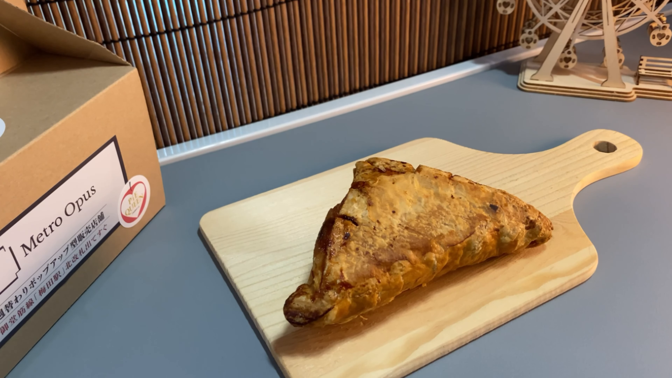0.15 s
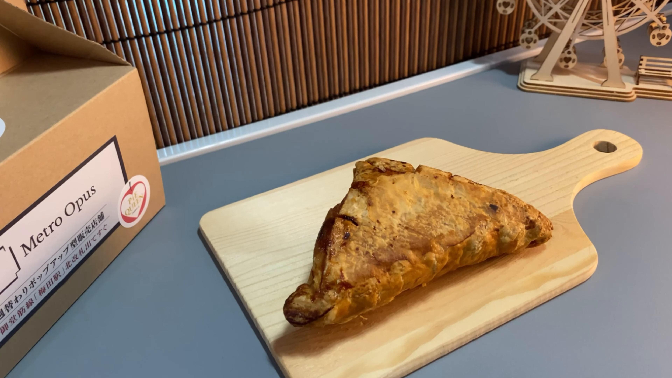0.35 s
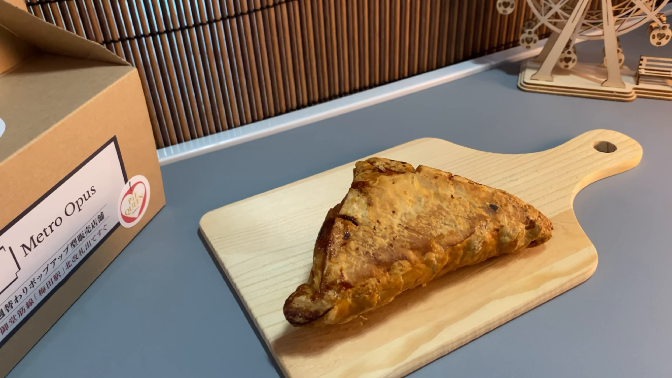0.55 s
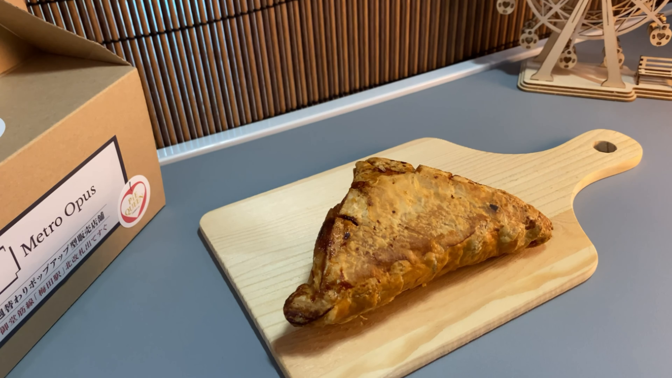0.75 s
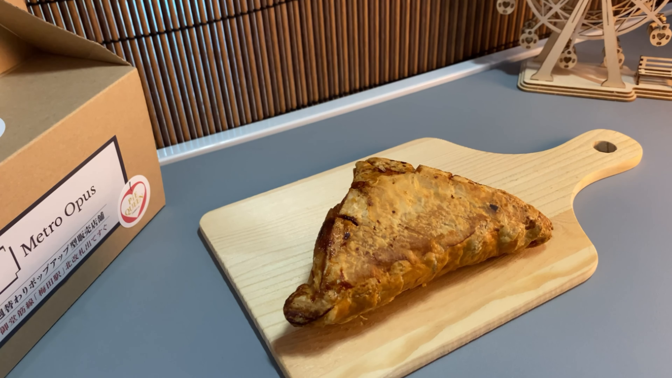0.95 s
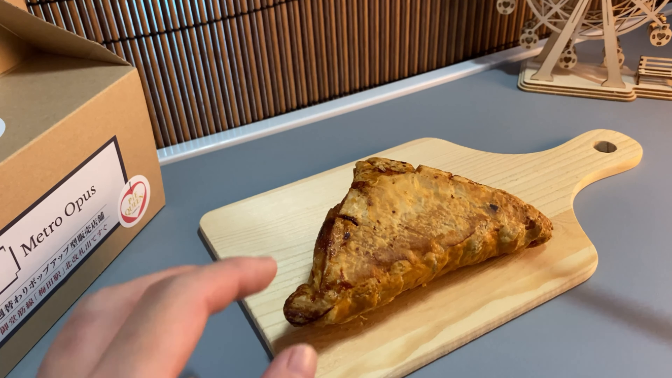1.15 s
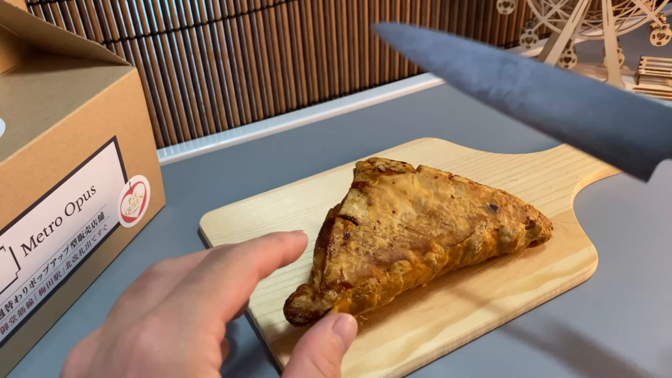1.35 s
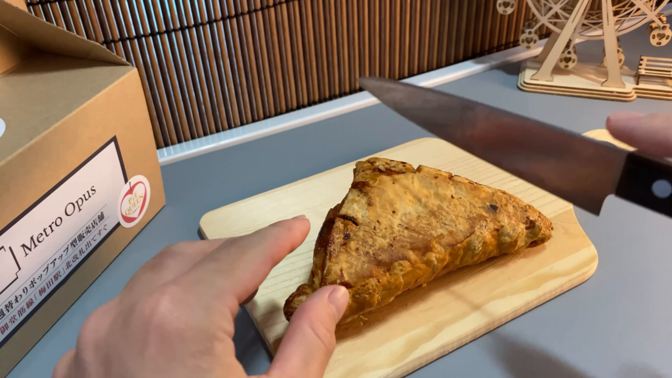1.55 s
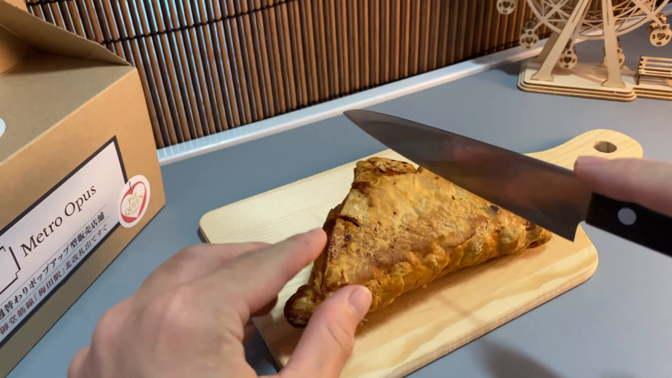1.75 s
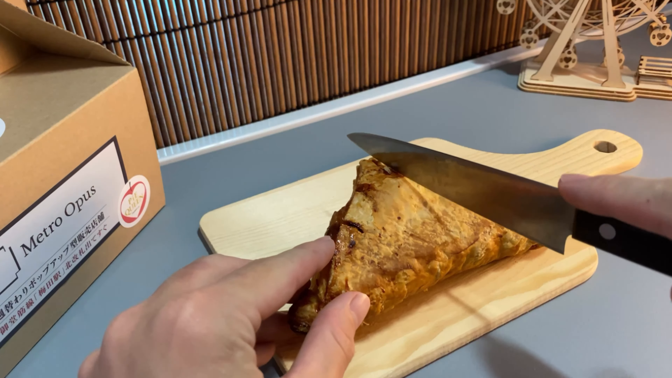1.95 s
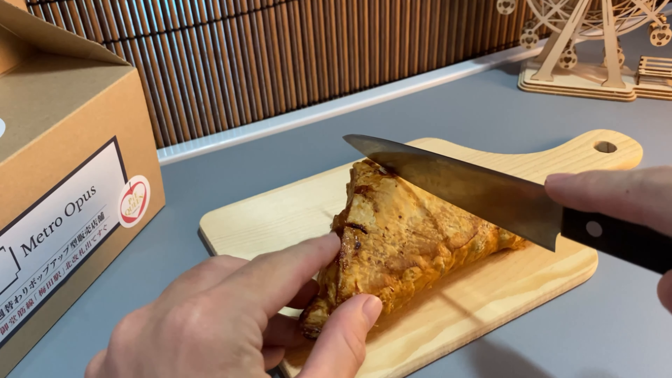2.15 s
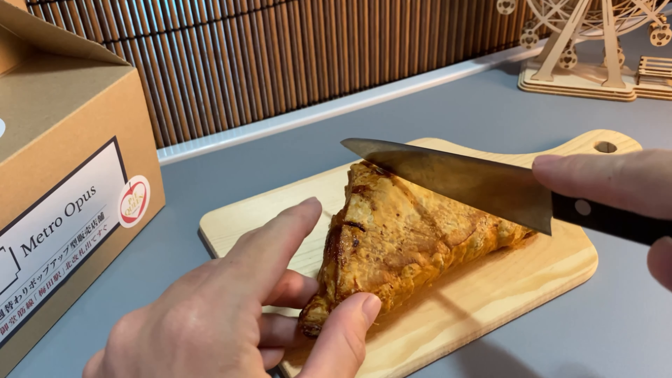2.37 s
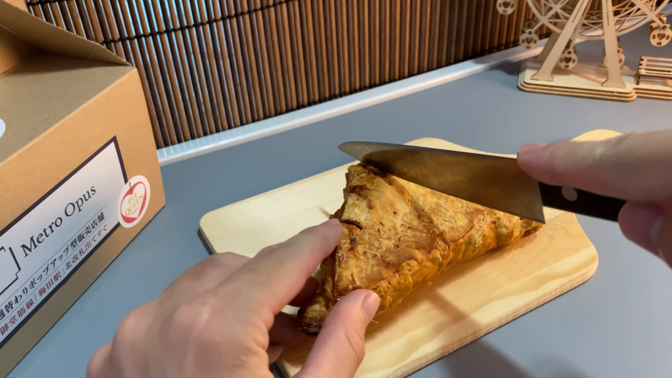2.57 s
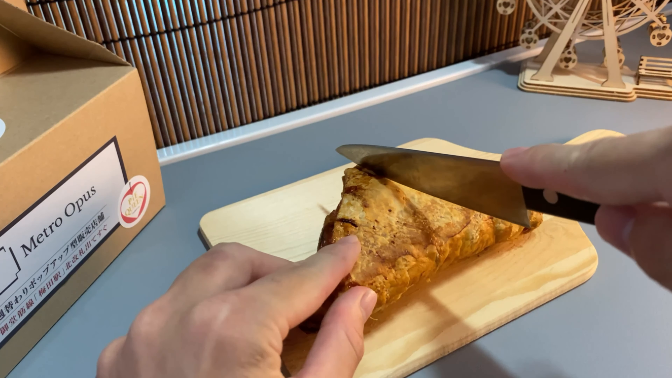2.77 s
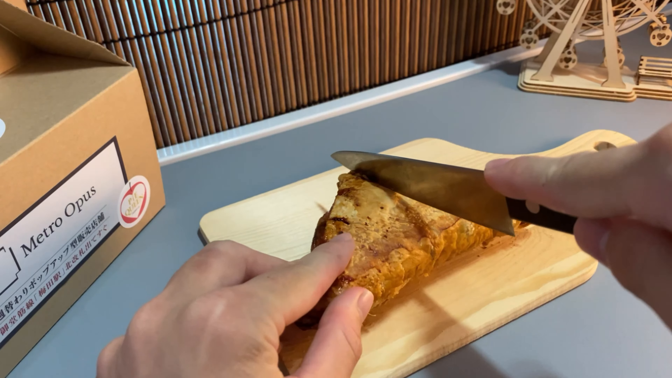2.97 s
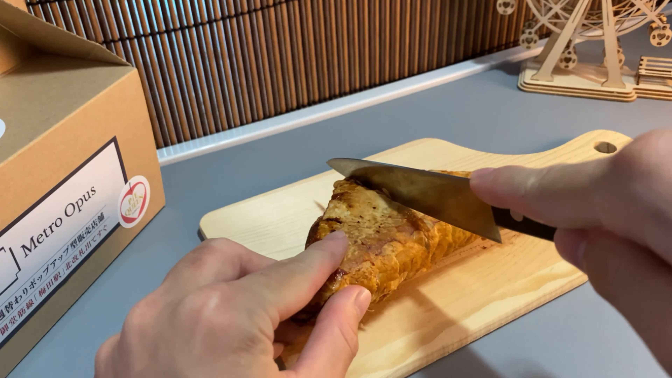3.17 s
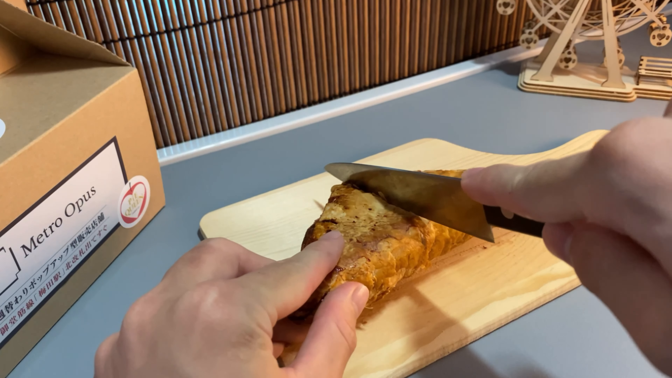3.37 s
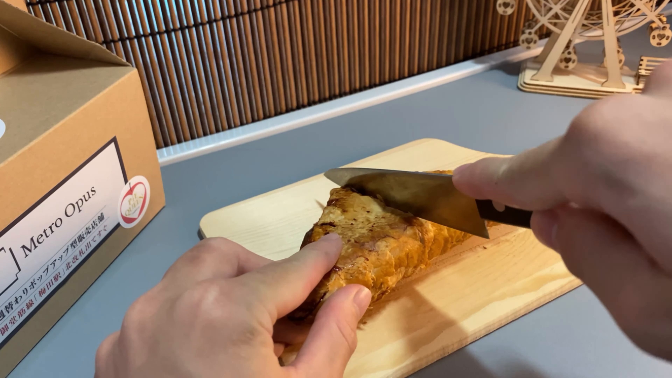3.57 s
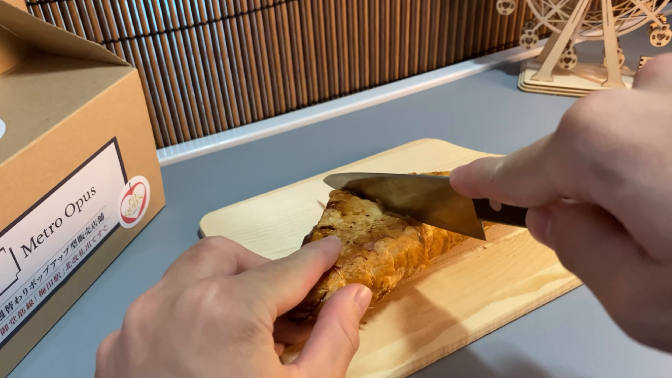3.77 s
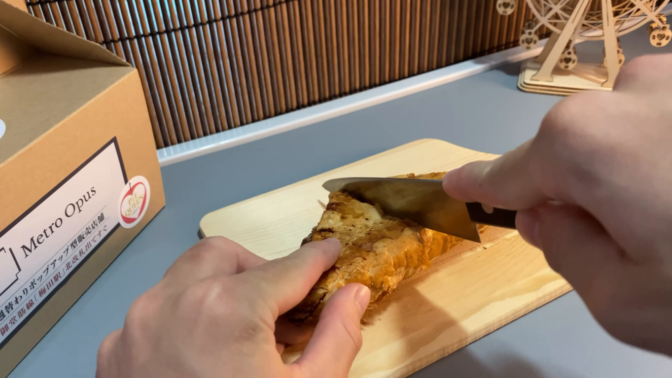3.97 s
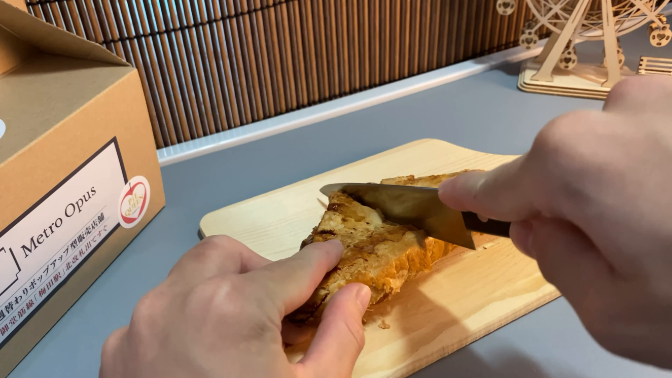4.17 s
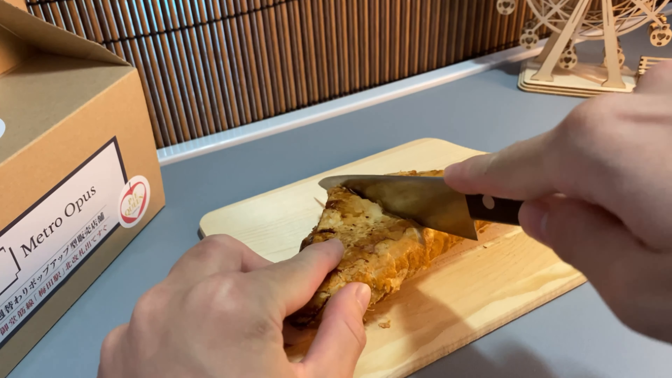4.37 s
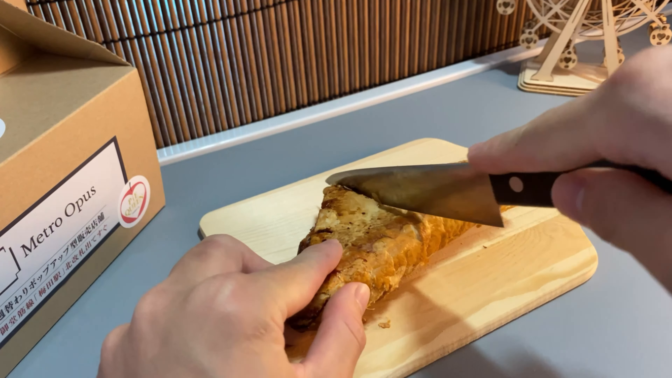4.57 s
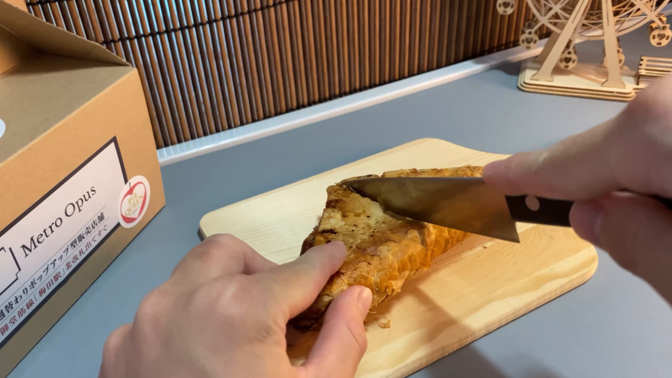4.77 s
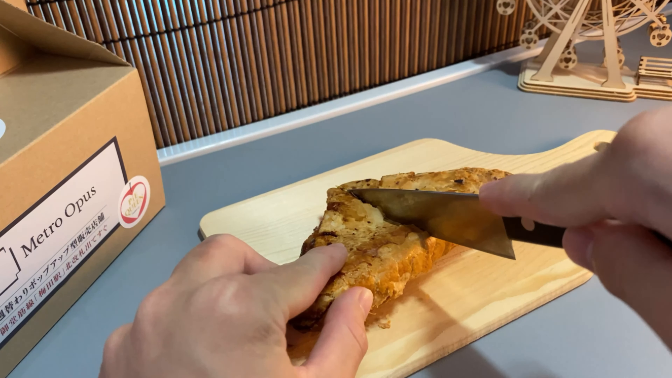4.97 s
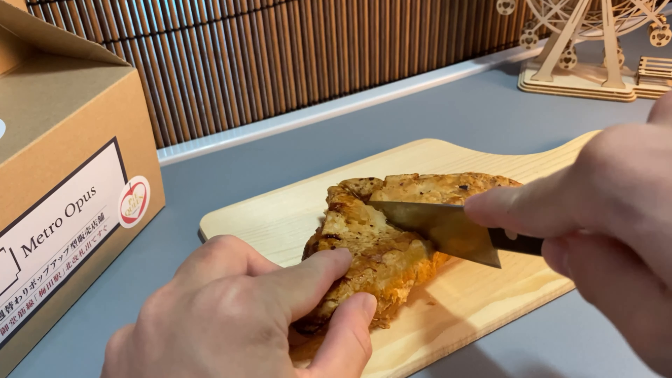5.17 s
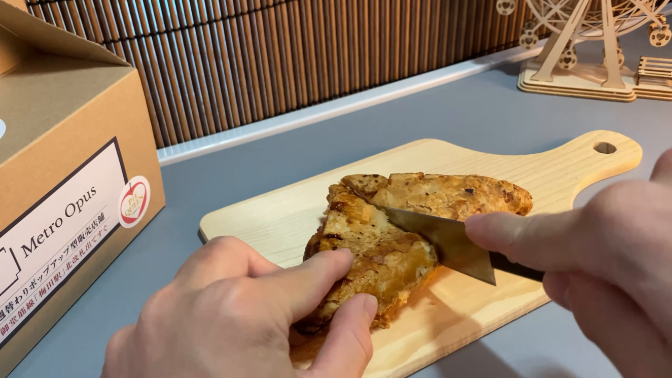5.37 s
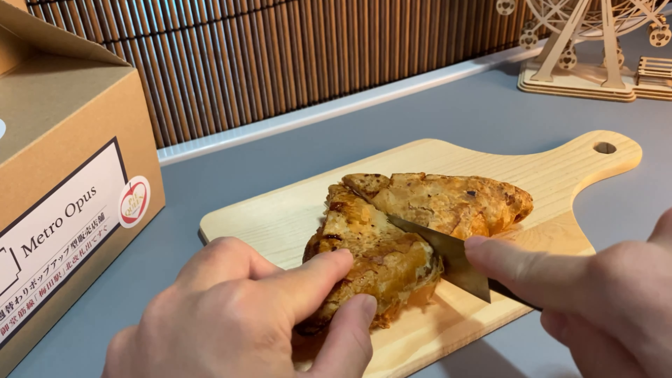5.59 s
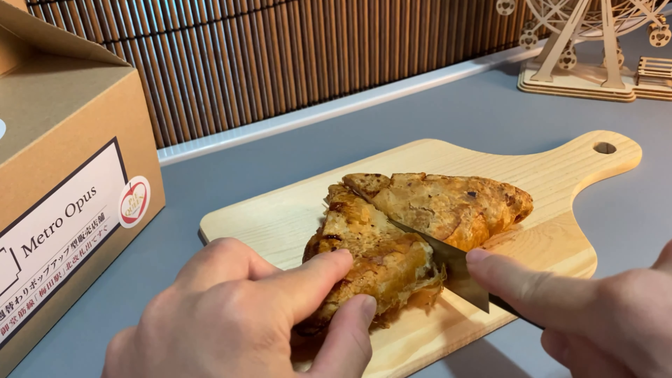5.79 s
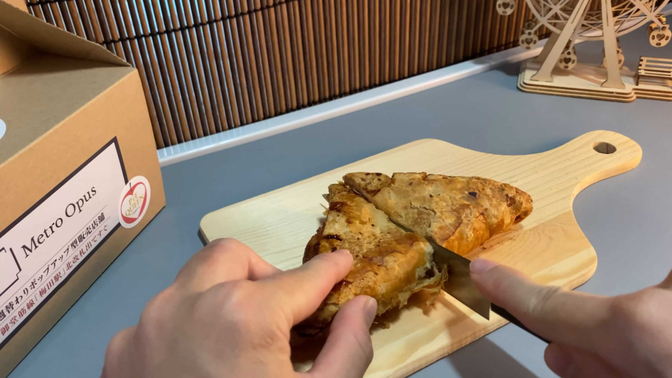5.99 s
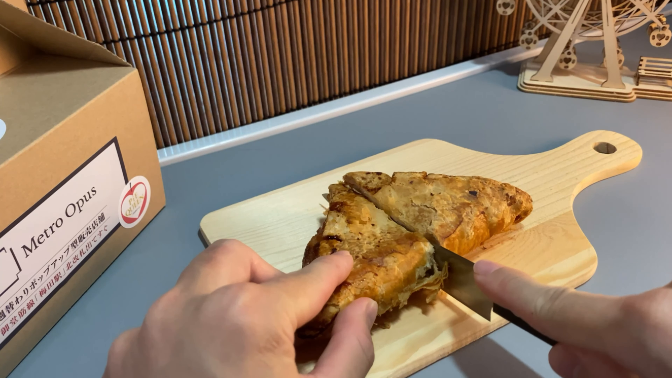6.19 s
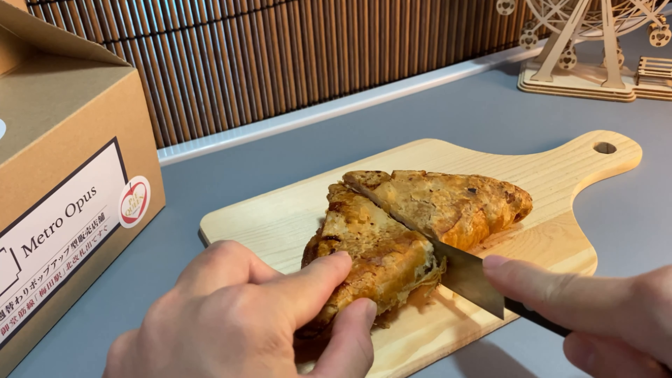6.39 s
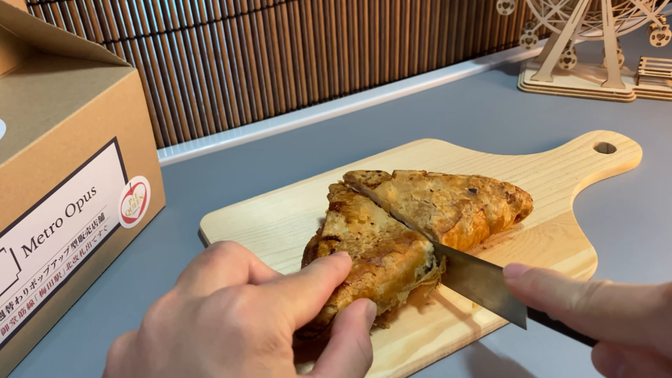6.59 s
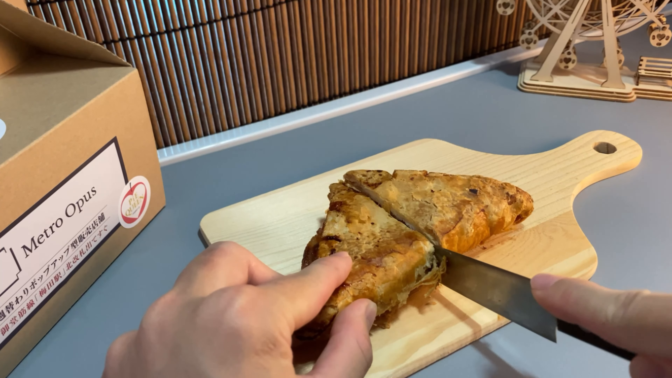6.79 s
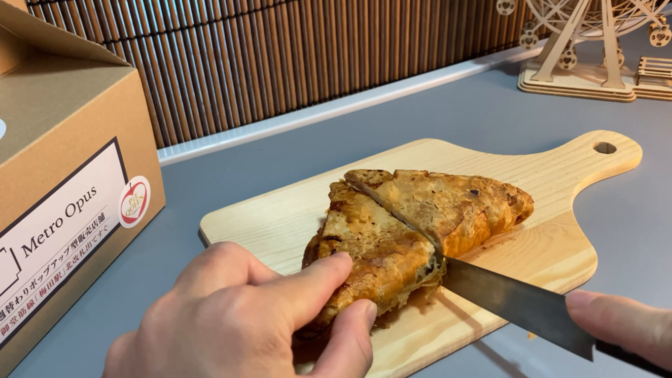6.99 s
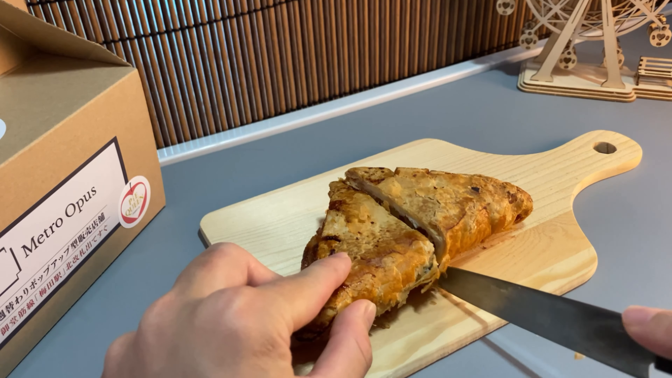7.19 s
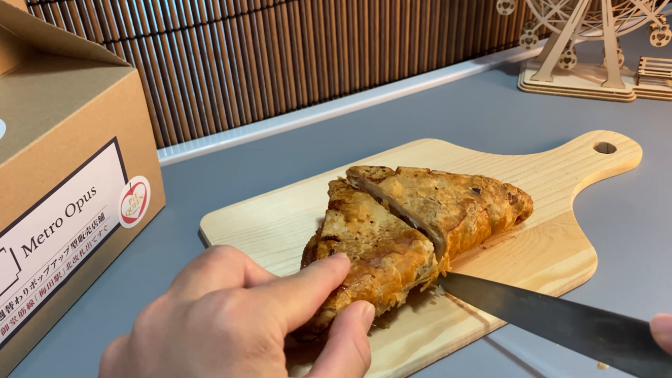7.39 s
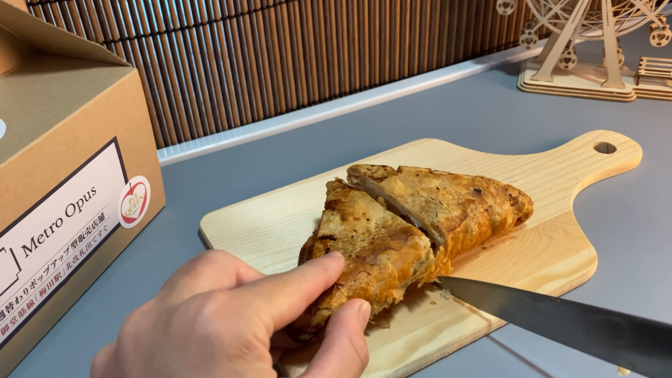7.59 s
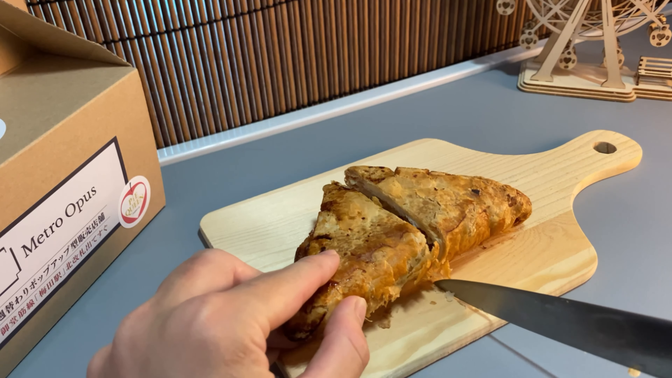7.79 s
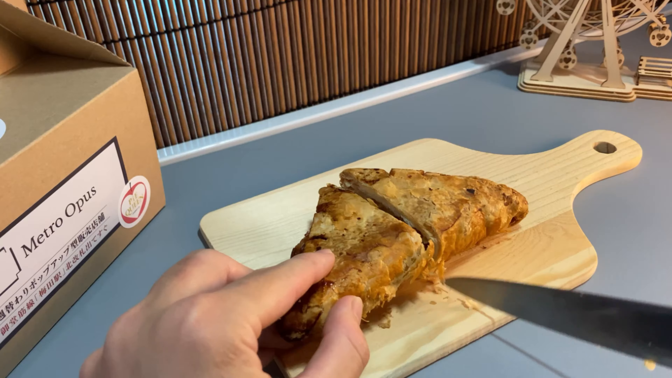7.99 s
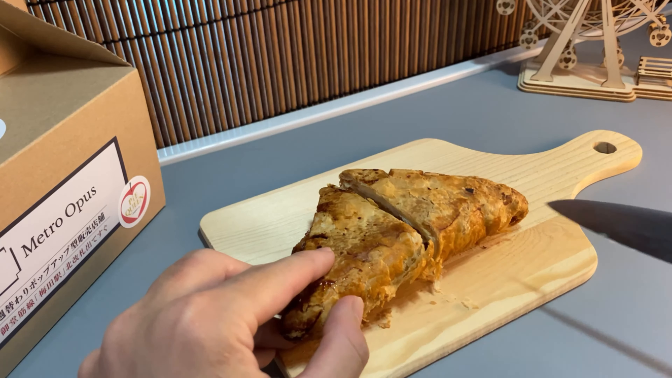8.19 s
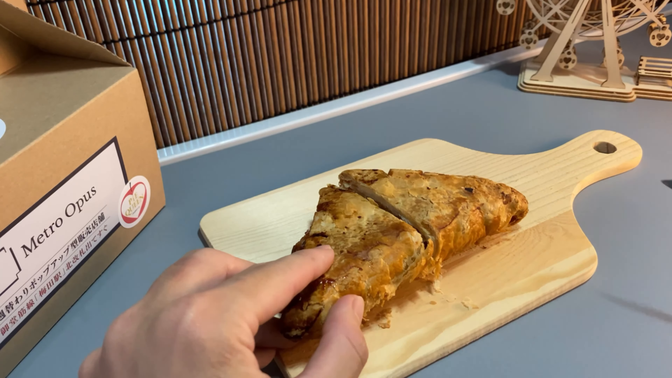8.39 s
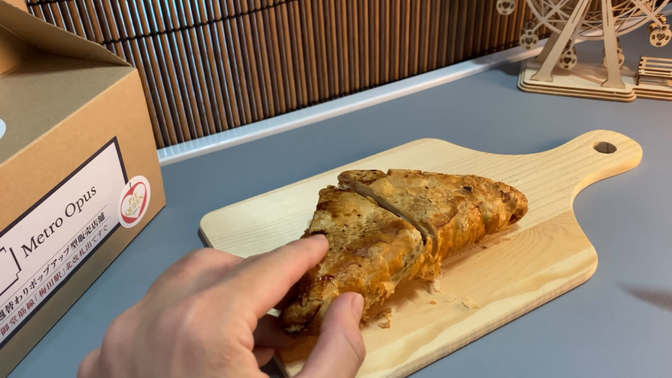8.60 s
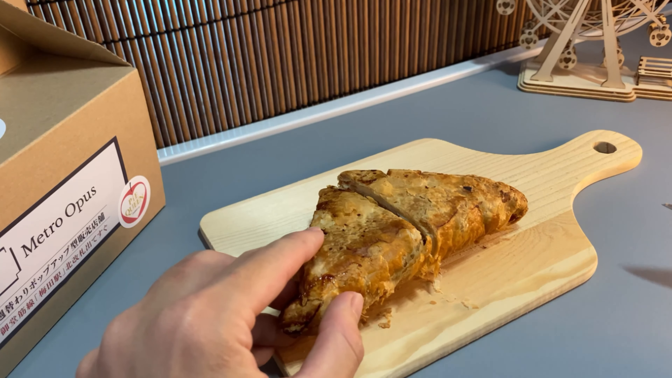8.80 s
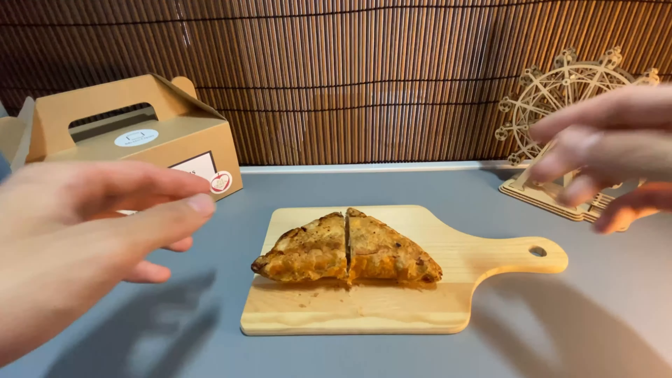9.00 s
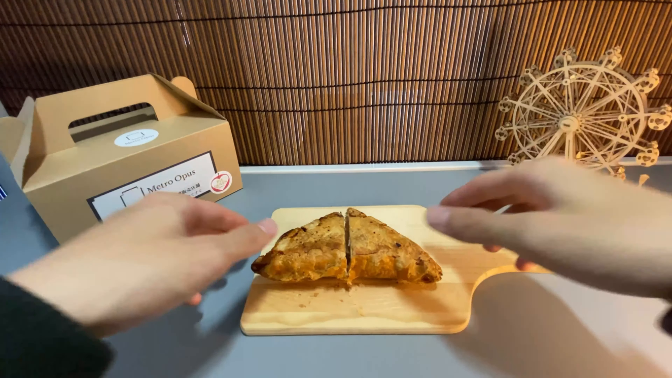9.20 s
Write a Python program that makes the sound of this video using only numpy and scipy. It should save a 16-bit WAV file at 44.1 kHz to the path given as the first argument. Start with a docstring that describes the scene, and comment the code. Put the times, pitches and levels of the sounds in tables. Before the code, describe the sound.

Close stereo pickup of a crisp pastry being cut on a wooden board. After near silence with cloth rustle and a small hard clunk, uneven strokes make bright ticking flakes and loud dry cracks, peaking before a solid board thump. More crunching follows, then another break and knock, fine scraping of steel on wood, sparse crumbs ticking, and soft hand bumps on the table. The room is dry and still.

```python
"""Sleeves brush softly in a quiet room and an unseen utensil clunks on the table. Then a kitchen knife saws
through a flaky pastry on a wooden board, close to the microphone: sharp pulses through resonances make the
snapping crust, swarms of tiny ticks the crunch. The edge breaks through, knocks and grinds on the board (ringing
tones and filtered slips), then is drawn along the wood with its blade ringing. Hands bump and rub the table."""
import sys
import numpy as np
from scipy import signal
from scipy.fft import rfft, irfft
from scipy.io import wavfile
from scipy.ndimage import uniform_filter1d

SR = 44100
rng = np.random.default_rng(int(sys.argv[2]) if len(sys.argv) > 2 else 0)


def store_wav(level_fs):
    """Save 16-bit WAV to argv[1]."""
    pcm = np.round(np.clip(np.atleast_2d(level_fs), -1, 1) * 32767)
    wavfile.write(sys.argv[1], SR, pcm.T.astype(np.int16))


N = 407925
T = np.arange(N) / SR

# strokes of the knife: [hardest t/s, swelling t/s, easing t/s, thick crust level/dB, swell/dB,
# thin flakes over crust/dB, board drag over crust/dB]
KNIFE_STROKES = [(1.8, 0.011, 0.011, -56.5, 1.5, 0.5, -3), (2.0, 0.072, 0.089, -38, 11, -0.5, -8),
                 (2.2, 0.057, 0.37, -63, 4, 0.5, 2.5), (2.76, 0.13, 0.044, -61.5, 2.5, 2, 5),
                 (2.94, 0.1, 0.12, -51.5, 4.5, -0.5, -4.5), (3.25, 0.16, 0.2, -51.5, 3.5, 2, -5.5),
                 (3.505, 0.038, 0.029, -39.5, 7.5, 5.5, -9.5), (3.57, 0.018, 0.044, -43, 3, 4, -10),
                 (3.658, 0.021, 0.04, -40, 7, 3.5, -6), (3.84, 0.11, 0.022, -47.5, 1, 1, -5),
                 (3.93, 0.043, 0.028, -44, 2, 3, -4.5), (4.105, .12, 0.035, -37.5, 4.5, 5, -4.5),
                 (4.26, 0.086, 0.14, -52, 1.5, -0.5, -3), (4.41, 0.067, 0.21, -47.5, 11, -4.5, -9),
                 (4.76, 0.076, 0.082, -47, 3.5, -4.5, 0.5), (4.97, 0.12, 0.057, -52, 1, 0, -5),
                 (5.12, 0.12, 0.045, -26, 23.5, -2, -5.5), (5.215, 0.031, 0.12, -35, 5.5, -7.5, 1),
                 (5.37, 0.07, 0.14, -35.5, 11.5, -2, -2.5), (5.55, 0.058, 0.12, -42, 5, 4.5, -6),
                 (5.83, 0.14, 0.34, -48.5, 9, 0.5, -5), (6.33, .14, 0.22, -45, 10.5, -7.5, -4),
                 (6.58, 0.13, 0.68, -45.5, 3, -9, -8.5), (6.985, 0.031, 0.012, -37, 8, -5, -5),
                 (7.055, 0.051, 0.075, -29, 15, -5, -11.5), (7.14, .02, .45, -48.5, 2.5, -5, -8),
                 (7.76, 0.088, 0.036, -47, 6, -2, -2), (7.82, 0.014, 0.12, -52.5, 0, -6, -7),
                 (7.98, 0.012, 0.029, -52, 6, -2, -4), (8.06, .01, 0.014, -50.5, 4, -3.5, -3.5),
                 (8.19, 0.046, 0.26, -66, -0.5, 3, 1), (8.57, 0.16, 0.15, -65, 9, 5, -11)]
# the loudest crust layers breaking: [t/s, level/dB, flake resonance f/Hz, its Q (at least 0.5 is used),
# splinters after the break/dB (at most 0 is used), left minus right/dB]
CRUST_SNAPS = [(2.0413, -29.5, 1520, 1.5, -10, -3), (2.1955, -29, 3800, 2.3, -10, 4),
               (2.2084, -28.5, 2560, 0.3, -24, -3), (2.9266, -34.5, 3400, 0.44, 0, 5),
               (3.1085, -33, 4530, .5, 0, 4), (3.1515, -34, 1600, .5, -23, -0.5),
               (3.2458, -30.5, 3080, 0.97, 0, 2), (3.2887, -20.5, 10420, 1.6, 0, 2),
               (3.3355, -12, 4200, 1.5, -18, -0.5), (3.3816, -24.5, 9400, 7.8, 0, 3.5),
               (3.4316, -21, 10500, 0.92, 0, 8), (3.4545, -27, 10500, 2.4, -6, 10),
               (3.487, -24, 10500, 1.9, -15, 18), (3.5013, -19.5, 5940, 1.4, 0, 7),
               (3.5306, -28, 8900, 1.6, -20, 11), (3.597, -29.5, 3600, 0.46, 0, 8),
               (3.6495, -21, 5100, 0.77, 0, 5), (3.7312, -31.5, 1780, 0.48, 0, 2),
               (3.7746, -28.5, 1160, 0.76, -22, 4.5), (3.789, -30, 10500, .5, -10.5, 4),
               (3.8322, -26.5, 10500, 0.93, 0, 7), (3.8624, -25, 8000, 0.42, -7, 4),
               (3.9046, -23, 3250, 1, 1, 4), (3.924, -27, 5400, 0.89, -6, 4),
               (3.9356, -26, 7100, .7, 0, -2), (4.01, -24.5, 8900, 1.1, -10, -8),
               (4.0744, -10, 3400, 0.63, -8, 0), (4.0912, -10.5, 3900, 4.5, -21, -1),
               (4.114, -14, 10500, 1.3, 1, -1.5), (4.118, -11, 7500, 0.59, -7, 0),
               (4.201, -29, 10500, 2.3, -9, 7), (4.315, -27.5, 10000, 1.5, 0, 0),
               (4.3543, -30, 6760, 1.8, 0, 11), (4.7839, -27, 7600, 1.7, -12, -1),
               (4.8553, -17, 7280, 4.1, -7, -3), (4.941, -39, 4100, 1.6, -13.5, -2),
               (4.973, -35, 4800, .9, -1, 7), (5.3288, -15, 5230, 1.1, -5, -1),
               (5.357, -20, 6400, 4, -15, -2), (5.4062, -19.5, 6400, 0.66, -4, 1),
               (5.4664, -23.5, 9900, 0.62, 4, 2), (5.474, -21, 7197, 1.6, -19, -4),
               (5.541, -20, 5700, .75, -9, 0), (5.5766, -24, 6400, 1.5, -12, 6),
               (5.606, -25, 6400, 2.2, -6, 1), (5.666, -23.5, 8150, 3.1, -8, 0),
               (5.6998, -18.5, 6766, 0.96, -0.5, 2), (5.7107, -26, 9400, 1.5, -9, 3),
               (5.7481, -16, 8250, 0.94, -7, 3), (5.76, -27, 3100, 7.2, 2.5, 4),
               (5.8098, -10, 7240, 1.76, -28, 4), (5.8178, -28, 10500, 0.92, -7, -2),
               (5.8526, -21.5, 5070, 0.79, -5, 1), (5.891, -30.5, 10500, .5, 0, 3),
               (5.9264, -23, 2650, 0.47, 0, -1), (5.9831, -27.5, 7100, 0.74, 2, 2),
               (6.027, -31, 3880, 1.5, -15, -7), (6.0478, -29, 3280, 4.6, -14, -3),
               (6.055, -30.5, 3380, 3.4, -11, -3), (6.0987, -36, 10500, .5, -9, 8),
               (6.1562, -35, 8900, 0.43, 0, 1.5), (6.4773, -32, 2200, .7, -6, 1),
               (6.5028, -30, 9900, 1.5, -4, 9), (6.573, -21.5, 10600, 2.4, -0.5, 10),
               (6.8751, -31, 3900, .7, -2, 6), (6.982, -21, 10500, .5, -11, -5),
               (6.9922, -20, 2660, .7, -6, -1), (7.0248, -22.5, 2800, .8, -8, 4),
               (7.0332, -18, 10620, 1.6, -16, -2), (7.049, -23, 6000, .6, -5, 5),
               (7.0604, -11, 3260, 0.43, 0, 3.5), (7.2986, -27.5, 10600, 3.3, -17, 5),
               (7.4257, -31.5, 4100, 0.45, 0, 2), (7.545, -35.5, 2500, 0.4, -10, 3.5),
               (7.6982, -32.5, 1196, 0.88, 0, 2.5), (7.971, -30.5, 3115, .5, 4.5, -2),
               (8.177, -40.5, 2120, 1.4, -9, 9), (8.5102, -40, 8000, 0.86, 0, 6),
               (8.575, -47, 6000, 0.69, -3, 6), (8.6713, -41, 3230, 0.9, -15, 6),
               (8.824, -42.5, 2700, 3.3, -11, 0)]
# how uneven the small fractures are; crust is coarse, steel on wood is fine: [t/s, spread of sizes/dB]
GRAIN_SPREAD = [(2.05, 2.4), (3.2, 4.8), (4.08, 3), (4.2, 4), (4.9, 4.2), (5.1, 2), (5.55, 3.4),
                (6.12, 4.6), (6.27, 1.5), (7.03, 1.9), (7.6, 1.5), (7.72, 3.4), (8.6, 4.4)]
# resonances of the crumbling pastry, thin and thick parts: [f/Hz, width/Hz, level/dB]
THIN_FLAKE_BANDS = [(5820, 3100, -1), (8270, 1240, -2), (9670, 1700, 3.5)]
THICK_CRUST_BANDS = [(1160, 590, 3), (2410, 900, -8), (3020, 1500, 2.5), (4450, 4200, 0)]
# the edge drawn along the wood: [hardest t/s, swelling t/s, easing t/s, low blade bending level/dB, swell/dB,
# high bending over low/dB]
EDGE_DRAWS = [(6.33, 0.12, 0.47, -47, 5.5, -10), (6.64, 0.094, 0.39, -49, -0.5, -10),
              (7.1, 0.049, 0.083, -45, 6, 4.5), (7.42, 0.237, 0.17, -52.5, 3.5, 2.5),
              (7.76, 0.084, 0.03, -54, 5, 4.5), (8.19, .02, 0.054, -60.5, 5.5, -12)]
# the blade's low and high bending modes: [f/Hz, width/Hz, level/dB]
BLADE_LOW_MODES = [(601, 47, 4), (638, 54, -24), (834, 110, -3), (1150, 60, -20.5)]
BLADE_HIGH_MODES = [(1560, 160, 3), (2170, 42.7, -7), (2108, 110, 10), (3000, 95, -2), (3720, 200, -10),
                    (4300, 180, -22)]
# blows on the board and table: [t/s, peak level before panning/dB, softness as top of the push f/Hz,
# bass edge f/Hz, left minus right/dB]
BOARD_KNOCKS = [(1.927, -37, 130, 40, 5), (2.357, -38.5, 177, 50, 2), (2.941, -37.5, 606, 80, 5),
                (3.501, -33.5, 900, 200, 2), (3.775, -37.5, 700, 200, 0), (4.074, -34, 1100, 300, 0),
                (4.171, -37, 900, 200, 0), (5.1315, -8.5, 560, 221, 2), (5.208, -29, 700, 200, 6),
                (5.313, -24, 480, 200, 4), (5.38, -24.5, 420, 200, -1), (5.927, -36, 900, 250, 0.5),
                (7.0655, -16, 760, 227, 3.5), (7.97, -31.5, 400, 90, -3), (8.317, -41, 750, 220, 1),
                (8.88, -31, 640, 110, 4.5), (8.966, -36.5, 218, 150, 1)]
# ringing of the board on the table: [f/Hz, time to fade by 60 dB t/s, level/dB]
BOARD_MODES = [(82.5, 0.067, -11.5), (152.7, 0.18, -8), (211.6, 0.19, -6), (298, 0.074, 0),
               (359, 0.029, -1.5), (446.4, 0.045, 2), (518.4, 0.034, 0), (573.3, 0.066, -0.5),
               (691, 0.18, -11), (798, 0.1, -3.5), (840, 0.032, -6), (946, 0.035, -6), (1184, 0.04, -12),
               (1560, 0.21, -9)]
# a utensil shifted on the table, out of sight: [t/s, peak level before panning/dB, top of the push f/Hz,
# bass edge f/Hz, left minus right/dB]
UTENSIL_CLUNKS = [(0.661, -30, 5000, 220, -14), (0.6645, -26.5, 4000, 221, 32), (0.67, -28, 5000, 220, 5),
                  (0.6805, -28, 2500, 176, 3)]
# ringing of the utensil: [f/Hz, time to fade by 60 dB t/s, level/dB]
UTENSIL_MODES = [(196, 0.061, -12), (289.5, 0.12, 8.5), (526, 0.023, 7), (610, 0.12, 3), (788, 0.1, 2.5),
                 (1133, 0.035, 0), (1550, 0.032, -0.5), (2255, 0.023, 3.5), (2390, 0.061, -9),
                 (3000, .06, -4), (3430, 0.062, -15), (4960, 0.14, -1)]
# hands sliding on the table: [hardest t/s, swelling t/s, easing t/s, level/dB, swell/dB]
HAND_RUBS = [(1.43, 0.055, 0.036, -45, 7), (1.67, 0.13, 0.026, -46.5, 20), (8.96, .07, 0.03, -51, 2),
             (9.05, .03, .2, -63.5, 5)]
# resonances of the table top: [f/Hz, width/Hz, level/dB]
TABLE_BANDS = [(217, 100, -3.5), (274, 57, 2.5), (354, 53, -4), (580, 72, -11), (850, 490, -17.5)]
# sleeves brushing as the arms move in: [hardest t/s, swelling t/s, easing t/s, level/dB, swell/dB]
SLEEVE_BRUSHES = [(.01, 0.025, 0.14, -54.5, 8.5), (.5, .15, 0.33, -56.5, 4.5), (1.12, 0.27, 0.61, -50, 8.5)]
# arms leaning on the table: [hardest t/s, swelling t/s, easing t/s, rumble level/dB, swell/dB]
ARM_LEANS = [(1.5, 2, 0.49, -67, 12), (9.16, .13, 0.17, -49.5, 12)]
# tone colour of rubbing cloth, then of the still room air: [f/Hz, level/dB]
SLEEVE_SPECTRUM = [(180, -16), (300, 0.5), (329, -19), (367, -8.5), (548, -1), (639, -9.5), (1080, -2),
                   (2300, -12), (8160, -10), (10600, -9), (12000, -27), (15600, -56), (22000, -120)]
AIR_SPECTRUM = [(12, -37), (20, -1.5), (69, -12), (134, -7), (217, -13.5), (299, -8.5), (401, -17),
                (434, -14.5), (685, -18.5), (1340, -16), (1790, -26), (2220, -22), (3700, -26.5),
                (9180, -25.5), (12000, -34), (15600, -63), (22000, -120)]

AIR_DB = -60
TOP_HZ = 11300
# lesser flakes break by chance wherever the crust is coarse, standing out from the crunch around them
FLAKES_PER_S, COARSE_SPREAD_DB = 30, 3.5
FLAKE_OVER_CRUNCH_DB, FLAKE_SCATTER_DB = 12.5, 1.5
FLAKE_LOW_HZ, FLAKE_HIGH_HZ = 2940, 11100
# every movement sets in quickly, swells to its hardest moment, eases off and stops
ONSET_DB_PER_S, RELEASE_DB_PER_S = 497, 649
# crumbling gathers as a layer is strained, and pauses once it has snapped
STRAIN_DB, STRAIN_S, RELIEF_DB, RELIEF_S = 4, 0.0085, 1.5, 0.017


def gain(db):
    """Turn decibels into a plain multiplier."""
    return 10 ** (np.asarray(db) / 20)


def unit(x):
    """Scale to an average strength (RMS) of 1."""
    return x / np.sqrt(np.mean(x ** 2))


def curves(table):
    """Each column of a table joined by straight lines in time."""
    s, *columns = np.transpose(table)
    return [np.interp(T, s, column) for column in columns]


def sides(pan_db):
    """Left and right gains of equal total power."""
    pair = gain(np.array([[.5], [-.5]]) * pan_db)
    return pair / np.sqrt(np.mean(pair ** 2, axis=0))


def band(x, hz, width_hz):
    """One resonance, gain 1 at its centre."""
    return signal.lfilter(*signal.iirpeak(hz, hz / min(width_hz, SR / 2.5), fs=SR), x)


def edge(x, hz, kind, order=2):
    """Keep what lies below ("low") or above ("high") a frequency."""
    return signal.sosfilt(signal.butter(order, min(hz, SR / 2 - 1), kind, fs=SR, output="sos"), x)


def walk(rate):
    """Slow random wandering with a spread near 1."""
    k = int(SR / rate)
    steps = np.repeat(rng.standard_normal(N // k + 1), k)
    return uniform_filter1d(steps, k)[:N]


def noise(spectrum, apart_hz):
    """Coloured stereo noise: the bass is alike on both sides, the treble unrelated."""
    f = np.arange(N // 2 + 1) * SR / N + 1
    hz, db = np.transpose(spectrum)
    colour = gain(np.interp(np.log(f), np.log(hz), db))
    mid, side = rfft(rng.standard_normal((2, N))) * colour
    side = side * f / (f + apart_hz)
    return unit(irfft([mid + side, mid - side], N))


def add(out, s, sound):
    """Mix a sound in at time s."""
    i = int(s * SR)
    out[:, i:i + sound.shape[1]] += sound[:, :N - i]


def movements(table):
    """Level in dB of a run of movements (onset, swell, easing, release), then of each layer they drive along."""
    t, power = T[::SR // 1000], 1e-12
    for s, swelling_s, easing_s, db, swell_db, *layers_db in table:
        start, end = s - swelling_s, s + easing_s
        shape = np.interp(t, [start, s, end], [-swell_db, 0, -swell_db])
        shape = shape - ONSET_DB_PER_S * np.maximum(start - t, 0)
        shape = shape - RELEASE_DB_PER_S * np.maximum(t - end, 0)
        offsets_db = np.array([0, *layers_db])[:, None]
        power = power + gain(db + shape + offsets_db) ** 2
    return curves(np.column_stack([t, *10 * np.log10(power)]))


def fractures(rate, spread_db, scatter_db, lag=0.):
    """Random tiny breaks, mostly small and a few large, each from its own place; steady in power."""
    size = gain(spread_db * rng.exponential(size=N)) * rng.choice([-1, 1], N)
    size = size * (rng.random(N) < rate / SR)
    power = uniform_filter1d(size ** 2, SR // 25)
    even = size / np.sqrt(np.abs(power) + 1e-6)
    left, right = even * sides(scatter_db * rng.standard_normal(N))
    # breaks reach the right side up to lag samples early or late
    arrival = (np.arange(N) + np.round(lag * rng.uniform(-1, 1, N)).astype(int)) % N
    return np.array([left, np.bincount(arrival, right, N)])


def snaps(table, splinter_s=0.0032, bass_ratio=0.17, bass_top_hz=1700, lag_s=.000018):
    """Each break is one sharp pulse through a flake's resonance, trailed by a few milliseconds of splinters."""
    out, t = np.zeros((2, N)), T[:1024]
    core = SR // 920  # the level is set over about the first millisecond
    for s, db, hz, q, splinter_db, pan_db in table:
        chips = rng.standard_normal((2, len(t))) * gain(4.1 * rng.exponential(size=len(t)))
        chips = chips * np.exp(-t / splinter_s) * (1 - np.exp(-t / 0.00076))
        chips = chips / np.sqrt(np.sum(chips ** 2) / 2)
        # the pulse reaches one microphone port a moment before the other
        arrival = np.abs(rng.normal(lag_s, lag_s / 2)) * rng.permutation(2)[:, None]
        pulse = np.sinc((t - arrival) * SR - 2)
        # the pulse comes back off the board a fraction of a millisecond later, which colours each snap
        # differently
        pulse = pulse + rng.choice([-.5, .5]) * np.roll(pulse, int(rng.uniform(0.00013, .0004) * SR))
        push = pulse + gain(min(splinter_db, 0)) * chips
        # the smaller the flake, the less bass it radiates
        flake = band(push, hz, hz / max(q, .5))
        sound = edge(flake, min(bass_ratio * hz, bass_top_hz), "high", order=3)
        sound = edge(sound, TOP_HZ, "low", order=4)
        strength = np.sqrt(np.mean(sound[:, :core] ** 2, axis=1, keepdims=True))
        add(out, s, sound / strength * gain(db) * sides(pan_db))
    return out


def flakes(thin_db, q=1.7, splinter_db=-7, pan_db=3, pan_scatter_db=5):
    """Chance snaps of lesser flakes in coarse crust, their level following the crunch; rows like CRUST_SNAPS."""
    spread_db, = curves(GRAIN_SPREAD)
    chance = rng.random(N) < FLAKES_PER_S / SR
    at = np.flatnonzero(chance & (spread_db > COARSE_SPREAD_DB) & (thin_db > AIR_DB))
    rows = []
    for i in at:
        db = thin_db[i] + FLAKE_OVER_CRUNCH_DB + FLAKE_SCATTER_DB * rng.normal()
        hz = rng.uniform(FLAKE_LOW_HZ, FLAKE_HIGH_HZ)
        rows.append((T[i], db, hz, q, splinter_db, pan_db + pan_scatter_db * rng.normal()))
    return rows


def crunch(thin_db, thick_db):
    """Countless small fractures: thin flakes tick high, thicker crust lower, some cracks run through both."""
    spread_db, = curves(GRAIN_SPREAD)
    # the finer the grain, the more breaks a second, until they merge into a scrape
    rate = 900 * (4.2 / np.maximum(spread_db, 1)) ** 2
    through = .5 * fractures(rate / 3, 1.25 * spread_db, 8, lag=1.5)
    # every resonance is struck by its own breaks as well as the shared ones
    thin = sum(gain(db) * band(fractures(rate, spread_db, 12, lag=2) + through, hz, width)
               for hz, width, db in THIN_FLAKE_BANDS)
    thick = sum(gain(db) * band(fractures(rate, spread_db, 9, lag=3) + through, hz, width)
                for hz, width, db in THICK_CRUST_BANDS)
    thin = unit(edge(edge(thin, 4200, "high"), TOP_HZ, "low", order=6))
    thick = unit(edge(edge(thick, 440, "high"), 7500, "low"))
    # one break sets off its neighbours, so coarse crust goes in short bursts
    bursts = gain(.16 * spread_db ** 2 * walk(150))
    bursts = bursts / np.sqrt(uniform_filter1d(bursts ** 2, SR // 20))
    return bursts * (thin * gain(thin_db) + thick * gain(thick_db))


def strain():
    """Change of the crunch in dB around each loud snap: a short build-up, then relief."""
    t = T[::SR // 1000]
    since = t[:, None] - np.array(CRUST_SNAPS)[:, 0]
    build = np.max((since <= 0) * np.exp(-np.abs(since) / STRAIN_S), axis=1)
    relief = np.max((since > 0) * np.exp(-np.abs(since) / RELIEF_S), axis=1)
    return np.interp(T, t, STRAIN_DB * build - RELIEF_DB * relief)


def resonate(x, bands):
    """Pass a sound through several resonances, every second one flipped in sign."""
    return sum((-1) ** k * gain(db) * band(x, hz, width) for k, (hz, width, db) in enumerate(bands))


def drag(drag_db):
    """The edge catches and slips through the base; the jerks shake the board."""
    slips = fractures(700, 3.74, 0.68)
    # the quicker a mode fades, the wider its resonance
    wood = resonate(slips, [(hz, 5.77 / t60, db) for hz, t60, db in BOARD_MODES])
    return unit(edge(wood, 1490, "low", order=4)) * gain(drag_db) * sides(1.7)


def draw():
    """Wood grain rubs the edge and rings the blade; higher modes come free as it leaves the pastry."""
    low_db, high_db = movements(EDGE_DRAWS)
    # the edge grips harder and softer as it crosses the grain
    rub = fractures(6000, 1.8, 4) * gain(2.5 * walk(45))
    low, high = resonate(rub, BLADE_LOW_MODES), resonate(rub, BLADE_HIGH_MODES)
    low = unit(edge(edge(low, 240, "high"), 1850, "low"))
    high = unit(edge(edge(high, 1050, "high"), 5000, "low"))
    return (low * gain(low_db) + high * gain(high_db)) * sides(1.2)


def ring(modes, detune):
    """A body's answer to a tap; each place of contact stirs the modes a little differently."""
    hz, t60, db = np.transpose(modes)[:, :, None]
    t, chance = T[:SR // 4], rng.standard_normal((2, len(hz), 1))
    phase = 2 * np.pi * hz * (1 + detune * chance[0]) * t
    fade = np.exp(-np.log(1000) * t / t60)
    return np.sum(gain(db + chance[1]) * np.sin(phase) * fade, axis=0)


def blows(table, modes, rattle_db, rattle_s, detune):
    """A push of finite softness rings the body, while the contact rattles briefly."""
    out = np.zeros((2, N))
    for s, db, push_hz, bass_hz, pan_db in table:
        body = ring(modes, detune)
        t = T[:len(body)]
        rattle = gain(rattle_db) * rng.standard_normal(len(t)) * np.exp(-t / rattle_s)
        sound = edge(body / np.abs(body).max() + rattle, push_hz, "low")
        sound = edge(sound, bass_hz, "high")
        add(out, s, sound / np.abs(sound).max() * gain(db) * sides(pan_db))
    return out


def hands():
    """Skin grips and slips on the table top."""
    rub_db, = movements(HAND_RUBS)
    slips = fractures(900, 3.4, 1.7)
    top = resonate(slips, TABLE_BANDS)
    return unit(edge(edge(top, 2100, "low"), 160, "high")) * gain(rub_db) * sides(6.3)


def room(x, wet_db=-20, t60=0.1, near_db=-18, near_s=0.007):
    """Quick scatter from the table and things on it, then the faint tail of a small room."""
    t = T[:SR // 2]
    near, tail = rng.standard_normal((2, 2, len(t)))
    near = near * np.exp(-t / near_s) * (t > .0015)
    tail = edge(tail, 13000, "low", order=1) * np.exp(-np.log(1000) * t / t60) * (t > .006)
    response = sum(gain(db) * echo / np.sqrt(np.sum(echo ** 2) / 2)
                   for db, echo in [(near_db, near), (wet_db, tail)])
    return x + signal.fftconvolve(x, response, axes=1)[:, :N]


def background():
    """Still room air, sleeves brushing, and the table rumbling under the arms, all from filtered noise."""
    (sleeve_db,), (rumble_db,) = movements(SLEEVE_BRUSHES), movements(ARM_LEANS)
    sleeves = noise(SLEEVE_SPECTRUM, 1000) * gain(sleeve_db + 0.8 * walk(19))
    rumble = band(band(rng.standard_normal(N), 106, 77), 106, 77)
    rumble = unit(rumble) * gain(rumble_db) * sides(4.5)
    air = noise(AIR_SPECTRUM, 640) * gain(AIR_DB + 0.33 * walk(1.7))
    return air + sleeves + rumble


def scene():
    """The knife's strokes, the knocks and the hands sound in the room, over its still air."""
    thick_db, thin_db, drag_db = movements(KNIFE_STROKES)
    crumbling = crunch(thin_db, thick_db) * gain(strain())
    knife = snaps(CRUST_SNAPS) + snaps(flakes(thin_db)) + crumbling + drag(drag_db) + draw()
    knocks = blows(BOARD_KNOCKS, BOARD_MODES, rattle_db=6, rattle_s=0.0039, detune=0.0063)
    clunks = blows(UTENSIL_CLUNKS, UTENSIL_MODES, rattle_db=-18, rattle_s=0.025, detune=0.0011)
    return room(knife + knocks + clunks + hands()) + background()


def record(dry):
    """The recorder rounds the tallest peaks and cuts the top octave."""
    rounded = dry / (1 + (dry / .76) ** 6) ** (1 / 6)
    return signal.sosfilt(signal.ellip(7, .3, 60, TOP_HZ, fs=SR, output="sos"), rounded)


dry = scene()
out = record(dry)
store_wav(out)
```